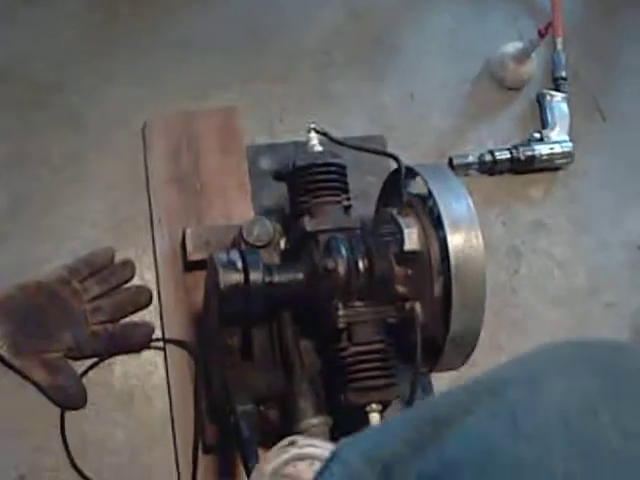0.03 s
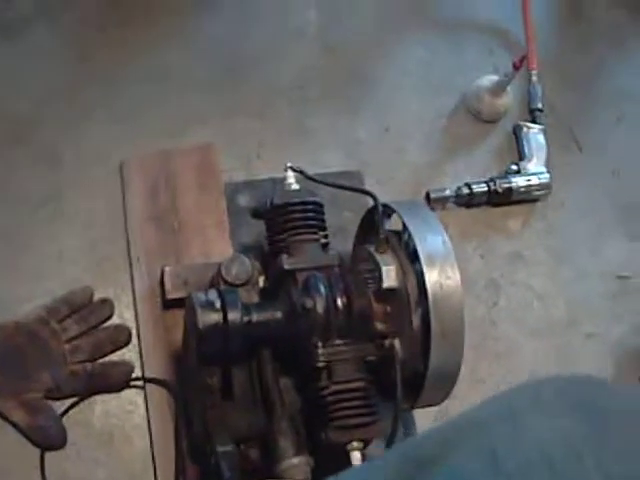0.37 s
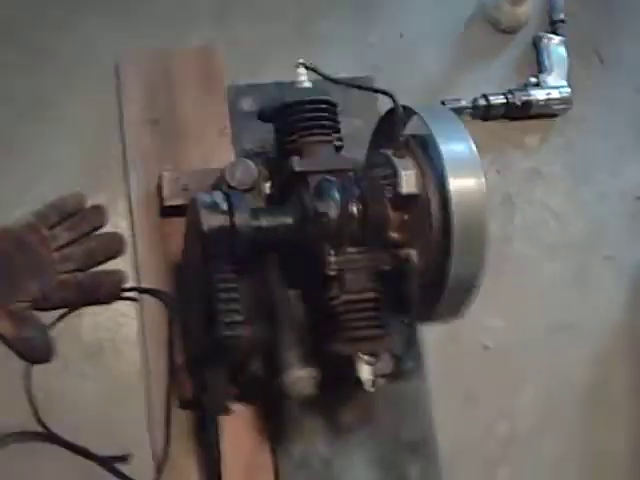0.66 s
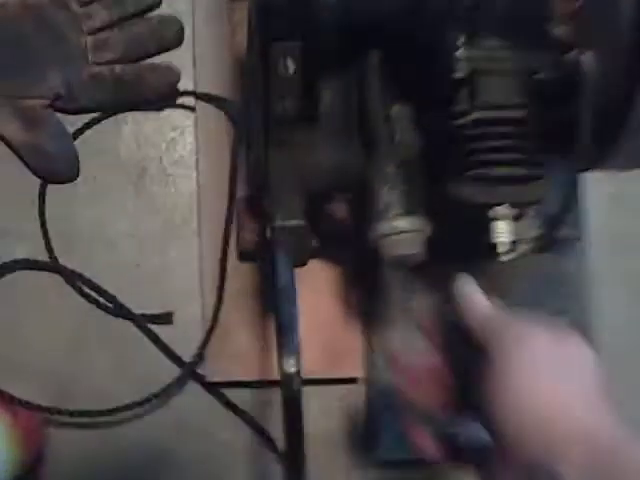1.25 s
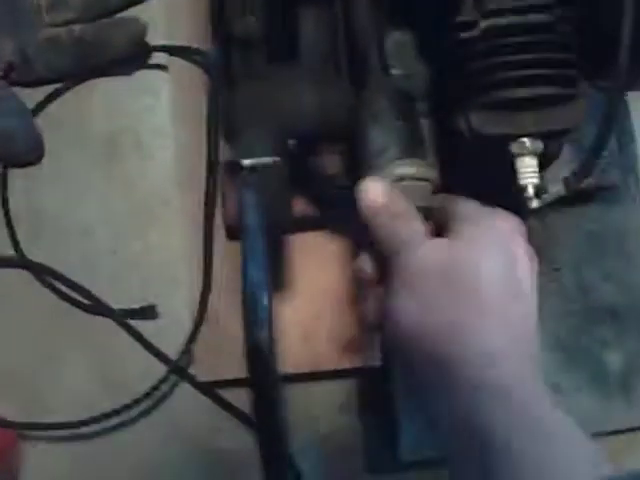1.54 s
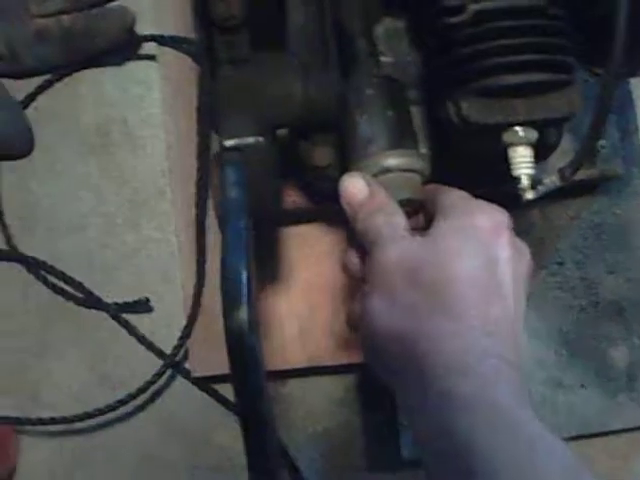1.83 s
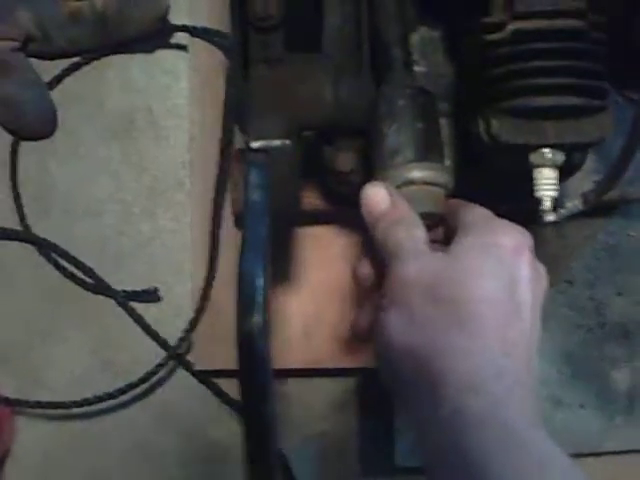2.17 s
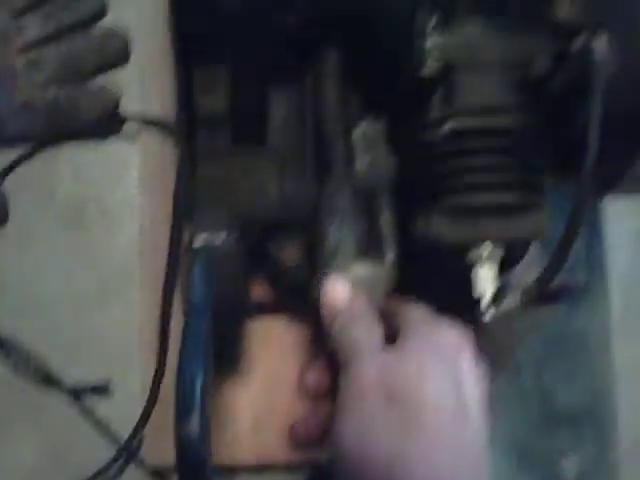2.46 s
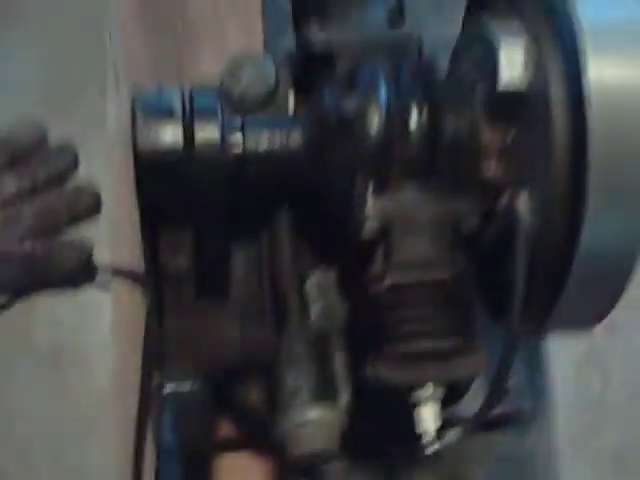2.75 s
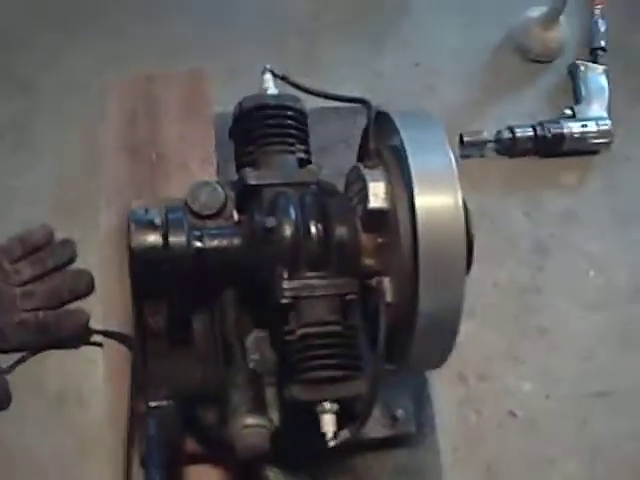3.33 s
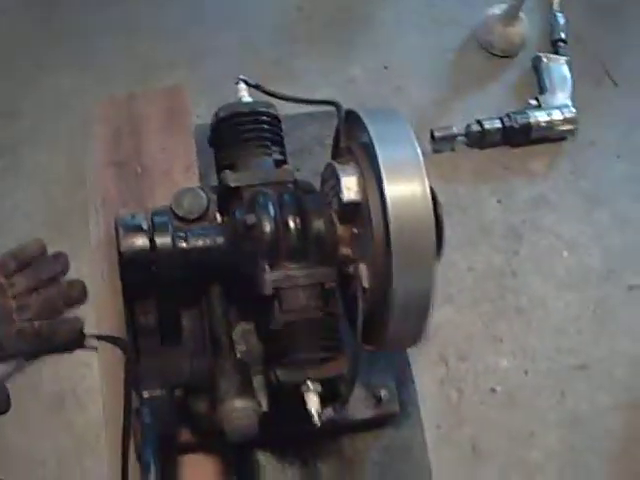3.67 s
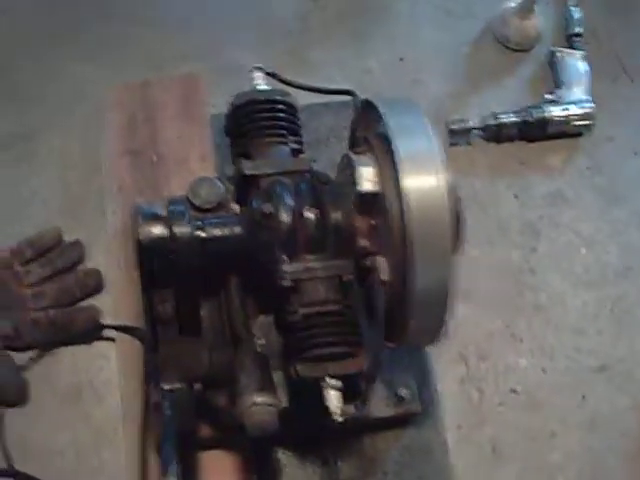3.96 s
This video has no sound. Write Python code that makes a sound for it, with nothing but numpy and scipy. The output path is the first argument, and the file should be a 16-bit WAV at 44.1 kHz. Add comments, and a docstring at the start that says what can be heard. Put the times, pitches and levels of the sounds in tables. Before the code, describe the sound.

A small old gasoline engine is kicked over, catches in uneven pops and speeds up.

```python
"""A faint motor hum in a workshop, then a clank and a rattle as a small antique two-stroke is kicked over. The
engine catches in uneven pops, about ten a second, and speeds up to twice that. Each pop is a thump, a gliding
ring of the crankcase and a blast of gas, over piston knocks and churning gear. The microphone stands close to
the engine, hears little above 4 kHz and overloads on the pops."""
import sys
import numpy as np
from scipy import signal
from scipy.fft import rfft, irfft, next_fast_len
from scipy.io import wavfile
from scipy.ndimage import uniform_filter1d, map_coordinates

SR = 44100
rng = np.random.default_rng(int(sys.argv[2]) if len(sys.argv) > 2 else 0)


def master(y):
    """Save y as 16-bit WAV."""
    cut = np.clip(np.atleast_2d(y).T, -1, 1)
    pcm = np.round(cut * 32767)  # scale
    wavfile.write(sys.argv[1], SR, pcm.astype(np.int16))


N = 176400

# tones of the distant motor: pitch_hz, level_db
MOTOR_TONES = [(140, -47), (278, -50), (301, -49), (349.7, -48), (382.5, -47), (419, -47.5), (625, -51.5),
               (692, -47.5), (770, -48)]
# room tone: frequency_hz, density_db
AIR_SPECTRUM = [(25, -4), (60, -8), (150, 4.5), (300, 6), (550, -0.5), (1000, -4), (1600, -13.5),
                (2700, -10.5), (4000, -14.5), (6000, -28)]

# churn of the running gear: time_s, level_db
GEAR_LEVEL = [(.47, -48), (0.558, -8), (.8, -26.5), (1.3, -22), (2, -23.5), (2.35, -26), (2.7, -20.5),
              (2.9, -10.5), (3.4, -11), (4, -10)]
# its colour: frequency_hz, density_db
GEAR_SPECTRUM = [(25, -12), (60, -4), (120, 4.5), (300, 15.5), (450, 10), (850, 7), (1300, -1.5),
                 (2200, -1.5), (3400, 0), (4300, -3), (6000, -32)]
# knocks of the loose piston and rod: start_s, level_db
PISTON_KNOCKS = [(.814, -20), (.911, -19), (1.010, -9.5), (1.111, -10), (1.214, -1), (1.317, -5.5),
                 (1.414, -5), (1.609, -11), (1.701, -6), (1.879, -8), (1.965, -6.5), (2.04, -13.5),
                 (2.139, -5), (2.203, -8), (2.226, -5), (2.308, -7), (2.371, -6.5), (2.384, -7),
                 (2.518, -2.5), (2.603, -5), (2.784, -7), (3.077, -9)]
# their colour: frequency_hz, density_db
KNOCK_SPECTRUM = [(150, -10), (450, -13), (650, 15.5), (870, 21), (1150, 10), (1600, -3.5), (4000, -17)]

# the starter lever hits its stop: start_s, level_db, t60_s
STOP_HIT = (.478, -10, 0.098)
# noise of that hit: frequency_hz, density_db
STOP_SPECTRUM = [(200, -18), (500, -4), (750, 4), (1100, 3), (1800, -1.5), (2500, -8.5), (4000, -13.5),
                 (6000, -32)]
# modes of the stop: pitch_hz, level_db, t60_s
STOP_MODES = [(340, -13.5, .25), (422, -5, 0.51), (687, -11, .3), (732, -15, 0.27), (1103, -11, 0.23),
              (1620, -20, .25), (2170, -30, 0.082), (2540, -26, 0.15)]
# the lever rattles back over its ratchet: start_s, level_db, t60_s
RATCHET_CLICKS = [(.566, -1, 0.23), (0.585, 2, 0.21), (.612, -1, 0.17), (0.642, -6, 0.21),
                  (.676, -13, 0.11), (.72, -16, 0.06)]
# their colour: frequency_hz, density_db
RATCHET_SPECTRUM = [(100, -17), (300, -7.5), (450, -3), (560, 9.5), (680, 8.5), (800, 7.5), (1020, -1.5),
                    (1400, -11.5), (1800, -11), (2500, -16), (3600, -10.5), (6000, -39)]

# one pop per turn of the crank: start_s, thump_db, ring_db, blast_db
ENGINE_POPS = [(.549, 4.5, -14, -4.5), (0.817, -2.5, -10.5, -7.5), (0.914, -6, -5, -5),
               (1.013, -5, -11.5, -9.5), (1.115, -10, -3, 0), (1.215, -6, -11, -1.5), (1.319, -8, 1, -2.5),
               (1.416, -7, -12, -5.5), (1.517, -8, 0.5, -5), (1.613, -9, -11, -0.5),
               (1.705, 3.5, 2.5, -1.5), (1.794, 0.5, -3, -5), (1.883, 2.5, 0.5, -2), (1.97, -6.5, -10, -19),
               (2.054, -3.5, 0.5, 1.5), (2.138, 2.5, -1.5, -4.5), (2.231, -2, -7, -10),
               (2.311, -3, -9.5, -15.5), (2.390, 8, -1, 0), (2.467, -17, -8.5, -25), (2.535, 7, 1.5, 0.5),
               (2.607, 3, -22, -17), (2.672, 6, 1.5, -0.5), (2.737, 2, -10.5, -12.5),
               (2.796, -0.5, 2.5, -2), (2.853, -3, 1.5, 0), (2.912, -7, 2, -3), (2.970, 7.5, 3.5, -1.5),
               (3.026, -3, 3.5, -4), (3.079, -0.5, -5, -6.5), (3.132, 6, 3, -3), (3.187, -1.5, -1, -9),
               (3.238, -1.5, 2, -3.5), (3.291, -25, -3.5, -5.5), (3.341, -3, -4, -35.5),
               (3.385, 2, 8.5, 1.5), (3.434, -5, -16, -18.5), (3.478, 2, 5.5, -17), (3.526, -6, -0.5, 1.5),
               (3.57, 1, 1.5, -2), (3.617, -6, -2, -18), (3.657, 3, 5, -2.5), (3.704, 5.5, 5.5, -10),
               (3.745, -6, 0, -1.5), (3.791, -2, 4, -31), (3.832, 5.5, -4.5, -3.5), (3.877, 3, 8, -6.5),
               (3.919, -3, 1.5, -4), (3.963, -1.5, 0, -25.5)]
# the thump rises with engine speed: time_s, pitch_hz
THUMP_CURVE = [(.5, 148), (2.5, 155), (3, 183.6), (4, 187.4)]
# slow push of air, relative to the thump: time_s, level_db
PUSH_CURVE = [(.5, -18.5), (2, -20), (2.6, -15), (4, -10)]
# ring of the crankcase as the port opens: time_s, pitch_hz
RING_CURVE = [(.5, 266.7), (2.4, 267.2), (2.9, 231.2), (3.3, 229), (4, 224.5)]
# what every pop shakes, from plank and block to cooling fins: pitch_hz, level_db, t60_s
BODY_MODES = [(107.2, -13.5, 0.15), (197, -14, 0.17), (440.4, -25, .2), (865, -26, .25), (1108, -29.5, 0.3),
              (2510, -39, 0.25), (3155, -26, 0.25), (3410, -22, 0.27), (3800, -33, .2)]
# escaping gas: frequency_hz, density_db
BLAST_SPECTRUM = [(30, 6.5), (100, 4.5), (300, 3.5), (500, -1), (850, -2), (1300, -6), (2000, -4.5),
                  (2700, -1.5), (3500, -1), (4300, 2), (6000, -20)]

# narrow response of the microphone chain: frequency_hz, gain_db
MIC_RESPONSE = [(20, 0), (3500, 2), (3900, -2), (4200, -13), (4450, -27.5), (4750, -48), (5200, -54)]

THUMP_LEAD_S, THUMP_CREST_S, PUSH_S = 0.002375, 0.0057, 0.0048
RING_RISE_PER_TURN, PORT_CLOSES_TURNS = 0.251, 0.87
OVERLOAD_TOP, OVERLOAD_BOTTOM, HARDNESS = 0.38, 0.59, 4.57
BIAS, LOWER_RAIL, TOP_HZ = -0.099, -0.7, 15900  # the converter sits off centre, towards its lower rail


def amp(db):
    """Decibels to gain."""
    return 10 ** (np.asarray(db) / 20)


def unit(x):
    """Scale to rms 1."""
    return x / np.sqrt(np.mean(x ** 2) + 1e-20)


def wobble(rate, size=N):
    """A smooth random curve, rate knots a second."""
    return map_coordinates(rng.standard_normal(400), [np.arange(size) * rate / SR + 2], mode="mirror")


def curve_at(time_s, points):
    """The value of a (time_s, value) curve."""
    return np.interp(time_s, *np.transpose(points))


def coloured(x, points):
    """Filter by (frequency_hz, gain_db) points on a log frequency axis."""
    size = next_fast_len(N + 8192)
    hz, db = np.transpose(points)
    gain_db = np.interp(np.log(np.fft.rfftfreq(size, 1 / SR) + 1), np.log(hz + 1), db)
    return irfft(rfft(x, size) * amp(gain_db), size)[:N]


def noise(spectrum, patchy_db):
    """Coloured noise of rms 1, with patches of random gain in time and frequency."""
    cells = signal.stft(rng.standard_normal(N), nperseg=1024)[2]
    patches = uniform_filter1d(rng.standard_normal(cells.shape), size=7, axis=0)
    patches = unit(uniform_filter1d(patches, size=6, axis=1))
    patchy = signal.istft(cells * amp(patchy_db * patches))[1][:N]
    return unit(coloured(patchy, spectrum))


def add(track, start_s, sound):
    """Mix a sound into the track."""
    part = track[max(round(start_s * SR), 0):][:len(sound)]
    part += sound[:len(part)]


def burst(attack_s, t60_s):
    """Half a second of envelope: quick rise, exponential fall."""
    t = np.arange(SR // 2) / SR
    return (1 - np.exp(-t / attack_s)) * amp(-60 * t / t60_s)


def bursts(rows, attack_s):
    """Joint envelope of (start_s, level_db, t60_s) noise bursts, summed in power."""
    power = np.zeros(N)
    for start_s, db, t60_s in rows:
        add(power, start_s, (amp(db) * burst(attack_s, t60_s)) ** 2)
    return np.sqrt(power)


def struck(modes):
    """One blow on a set of modes, each with its own chance level and a slight waver."""
    t = np.arange(SR // 2) / SR
    out = np.zeros(len(t))
    for hz, db, t60_s in modes:
        envelope = amp(db + rng.normal(0, 2.5)) * burst(0.0013, t60_s)
        phase = 2 * np.pi * (hz * t + rng.random())
        waver = 0.69 * np.sqrt(hz / 1000) * wobble(62.5, len(t))
        out += envelope * np.sin(phase + waver)
    return out


def workshop():
    """Far from the microphone, a motor hums over the still air of the room."""
    t = np.arange(N) / SR
    hum = np.zeros(N)
    for hz, db in MOTOR_TONES:
        hum += amp(db + 2.1 * wobble(6.4)) * np.sin(2 * np.pi * hz * t + 0.87 * wobble(5.94))
    return np.sqrt(2) * hum + amp(-38.5) * noise(AIR_SPECTRUM, patchy_db=3.5)


def room_echo(x):
    """The short answer of the workshop's floor and walls."""
    tail = rng.standard_normal(SR // 2) * burst(attack_s=0.025, t60_s=0.46)
    return signal.fftconvolve(x, tail / np.linalg.norm(tail))[:N]


def running_gear():
    """The gear churns at the kick, drops back, then grows with engine speed."""
    level_db = curve_at(np.arange(N) / SR, GEAR_LEVEL) + 1.9 * wobble(70)
    return amp(level_db) * noise(GEAR_SPECTRUM, patchy_db=1.5)


def piston():
    """The loose piston and rod give short, dull knocks."""
    knocks = bursts([(start_s, db, 0.061) for start_s, db in PISTON_KNOCKS], attack_s=0.0012)
    return knocks * noise(KNOCK_SPECTRUM, patchy_db=7)


def starter():
    """The lever clanks on its stop, which rings, then rattles back over the ratchet."""
    rattle = bursts(RATCHET_CLICKS, attack_s=0.00059) * noise(RATCHET_SPECTRUM, patchy_db=6)
    clank = bursts([STOP_HIT], attack_s=0.0005) * noise(STOP_SPECTRUM, patchy_db=1.5)
    start_s, db, _ = STOP_HIT
    add(clank, start_s, amp(db) * struck(STOP_MODES))
    return clank + rattle


def gas_blasts():
    """Gas rushes out at each pop: a sharp burst of noise."""
    blasts = bursts([(start_s, db, 0.19) for start_s, _, _, db in ENGINE_POPS], attack_s=0.00067)
    return blasts * noise(BLAST_SPECTRUM, patchy_db=3)


def thump(start_s):
    """About two cycles of low tone over a slow push of air."""
    t = np.arange(SR // 2) / SR
    swell_age, push_age = t / THUMP_CREST_S, t / PUSH_S
    swell = (swell_age * np.exp(1 - swell_age)) ** 2.77
    push = push_age * (push_age - 2) * np.exp(1 - push_age)
    tone = np.sin(2 * np.pi * curve_at(start_s, THUMP_CURVE) * t)
    return swell * tone + amp(curve_at(start_s, PUSH_CURVE)) * push


def crankcase_ring(start_s, turn_s):
    """The crankcase rings at a pitch that climbs with the piston, until the port closes."""
    turns = np.minimum(np.arange(SR // 2) / SR / turn_s, 2)
    glide = 1 + RING_RISE_PER_TURN * turns + 0.05 * wobble(101, len(turns))
    hz = curve_at(start_s, RING_CURVE) * glide
    tone = np.sin(2 * np.pi * (np.cumsum(hz) / SR + rng.random()))
    port_open = 1 / (1 + (turns / PORT_CLOSES_TURNS) ** 8)
    return tone * burst(attack_s=0.004, t60_s=0.18) * port_open


def pops():
    """Close to the microphone, each firing thumps, rings the crankcase, shakes the iron and blows out gas."""
    out = np.zeros(N)
    turn_lengths_s = np.gradient([pop[0] for pop in ENGINE_POPS])
    for (start_s, thump_db, ring_db, _), turn_s in zip(ENGINE_POPS, turn_lengths_s):
        add(out, start_s - THUMP_LEAD_S, amp(thump_db) * thump(start_s))
        add(out, start_s, amp(ring_db) * crankcase_ring(start_s, turn_s))
        add(out, start_s, amp(thump_db) * struck(BODY_MODES))
    return out + gas_blasts()


def scene():
    """In mono: the engine up close, its echo and the workshop behind it."""
    engine = pops() + piston() + running_gear() + starter()
    return (engine + amp(-13.5) * room_echo(engine) + workshop())[None]


def record(dry):
    """The microphone overloads unevenly and is cut near 4 kHz; troughs crackle on the lower rail."""
    pressure = dry[0]
    limit = np.where(pressure > 0, OVERLOAD_TOP, OVERLOAD_BOTTOM)
    squashed = pressure / (1 + np.abs(pressure / limit) ** HARDNESS) ** (1 / HARDNESS)
    railed = np.maximum(coloured(squashed, MIC_RESPONSE) + BIAS, LOWER_RAIL)
    passband = np.fft.rfftfreq(N, 1 / SR) < TOP_HZ
    return irfft(rfft(railed) * passband, N)[None]


dry = scene()
out = record(dry)
master(out)
```